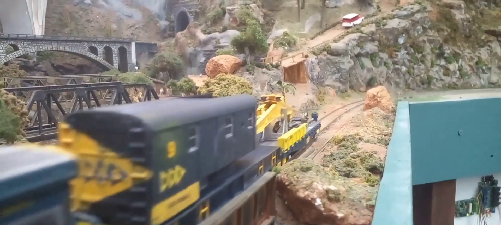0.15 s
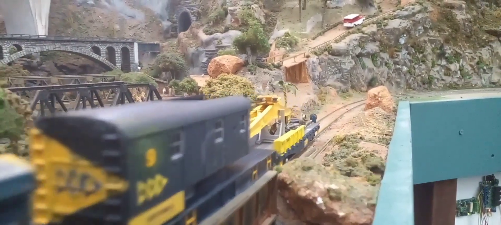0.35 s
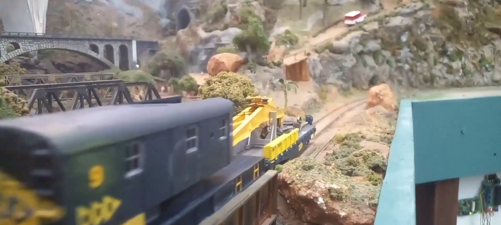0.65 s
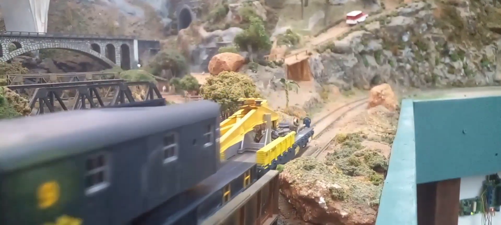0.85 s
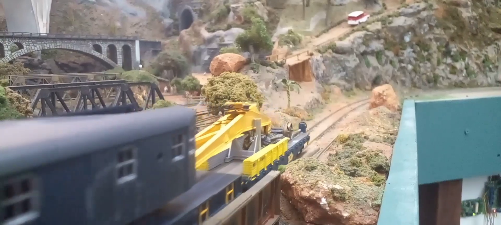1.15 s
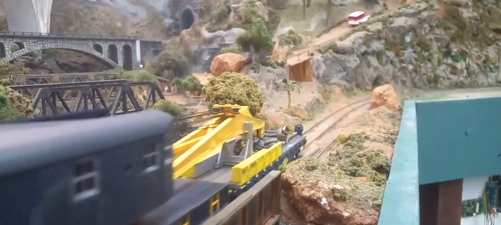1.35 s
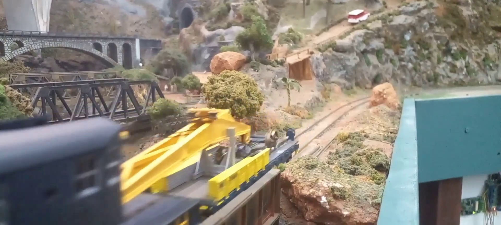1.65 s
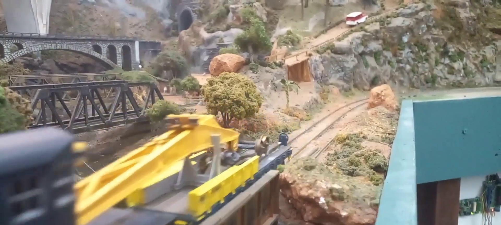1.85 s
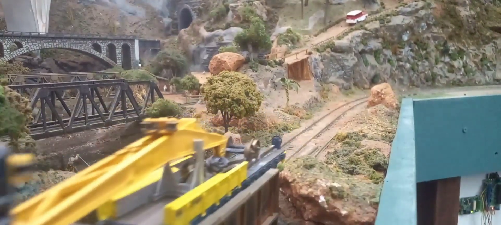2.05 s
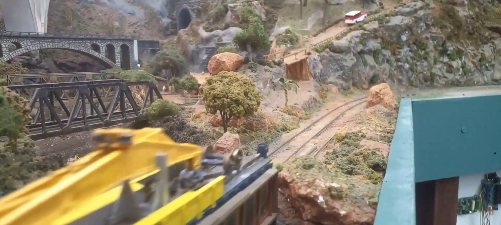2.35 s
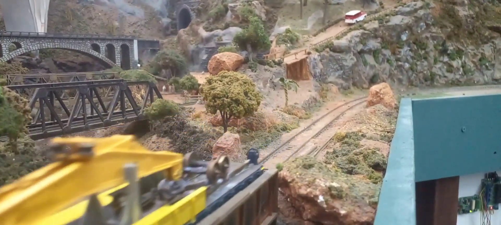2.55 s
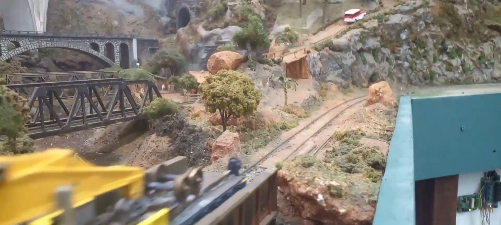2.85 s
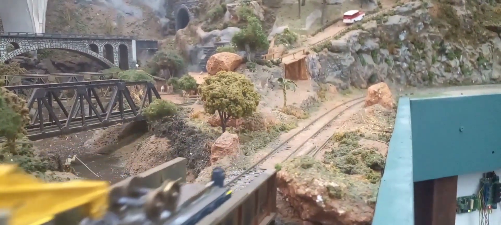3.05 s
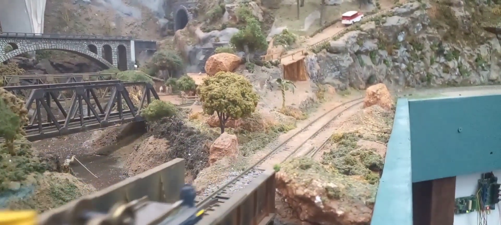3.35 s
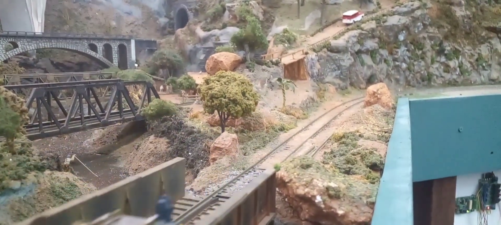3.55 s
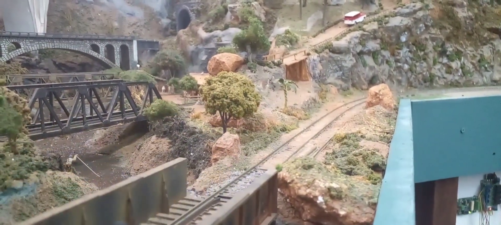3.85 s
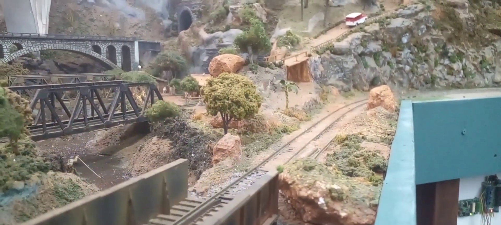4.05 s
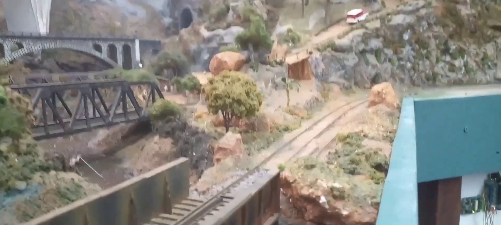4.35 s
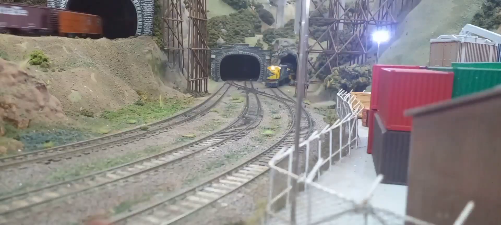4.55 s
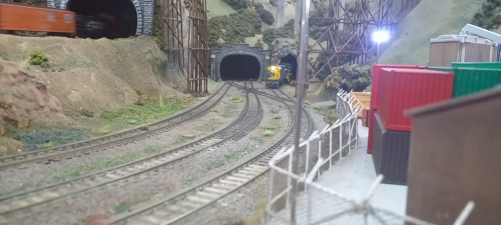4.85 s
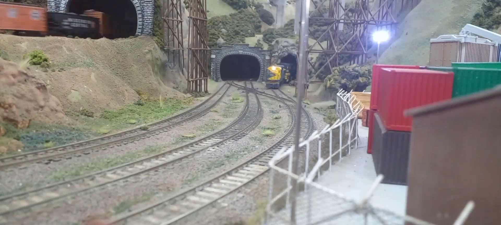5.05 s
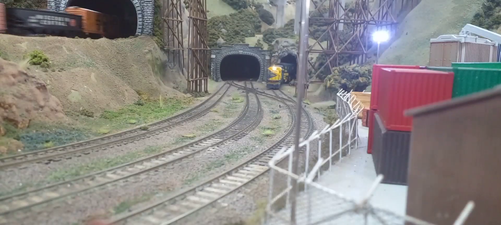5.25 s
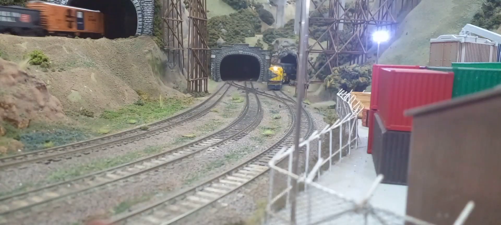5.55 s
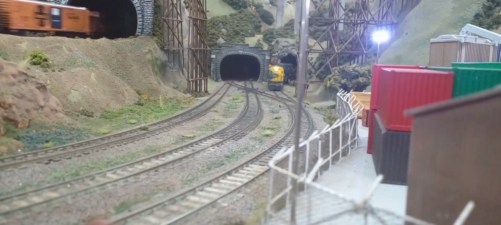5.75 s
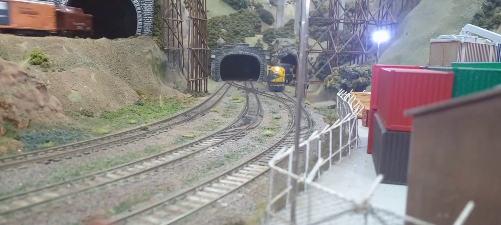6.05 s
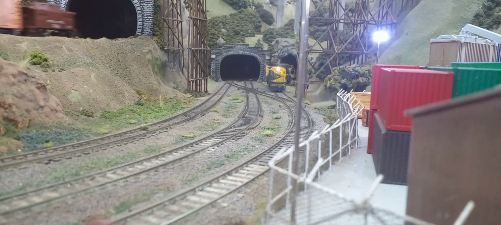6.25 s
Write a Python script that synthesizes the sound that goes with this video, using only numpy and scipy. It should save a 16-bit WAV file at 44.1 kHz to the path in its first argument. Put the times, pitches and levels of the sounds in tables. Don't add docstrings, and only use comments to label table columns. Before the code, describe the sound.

A quiet miniature train passes close by, its motor humming low and buzzy while wheels hiss and tick over joints. Clicks are faint at first, then crisp and bright, with light flange scuffs. The sound stops dead for a moment, then a denser, fuller rolling noise from several trains begins at once, rattling over points until the end. Dry indoor close pickup, centred.

```python
import sys
import numpy as np
from scipy import signal
from scipy.fft import rfft, irfft, next_fast_len
from scipy.io import wavfile
from scipy.ndimage import uniform_filter1d, map_coordinates

SR = 44100
rng = np.random.default_rng(int(sys.argv[2]) if len(sys.argv) > 2 else 0)


def gain_from_db(level_db):
    decades = np.asarray(level_db, float) / 20
    return 10 ** decades


def bounce(signal):
    frames = np.transpose(np.atleast_2d(signal))
    limited = np.clip(frames, -1, 1)
    pcm = np.round(limited * 32767).astype(np.int16)
    wavfile.write(sys.argv[1], SR, pcm)


N = 282240
TIME = np.arange(N) / SR
BRIDGE_ENDS_S, LAYOUT_STARTS_S = 4.2805, 4.4352
MIC_TOP_HZ = 15850
PATCHY_DB = 0.6

# (time [s], roll level [dB])
WHEEL_LOAD = [(0, -48), (.2, -49.5), (.55, -47), (.7, -49), (1.0, -46.5), (1.15, -50), (1.45, -47.5),
              (2.0, -47.5), (2.17, -46), (2.27, -48.5), (2.6, -47.5), (2.75, -45.5), (2.9, -45.5),
              (3.0, -48), (3.35, -47), (3.58, -50), (3.68, -47.5), (4.28, -47.5)]
FIZZ_DB, FIZZ_DB_PER_LOAD_DB, FIZZ_NEAR_DB, FIZZ_NEAR_S = -70.5, 0.5, 6, 1.2
DECK_DB, DECK_NEAR_DB, DECK_NEAR_S = -59, 8.5, 1.6
USUAL_LOAD_DB, HISS_DB, HISS_DB_PER_LOAD_DB, HISS_FADE_DB, HISS_FADE_S = -48, -56.5, 0.98, 3.5, 3.98
# (time [s], level [dB], half length [s])
DECK_THUMPS = [(0.037, -42, .03), (0.276, -48, .06), (0.697, -38.5, .04), (.81, -42.5, 0.048),
               (1.075, -40, 0.027), (1.22, -46, 0.055), (1.503, -45.5, 0.13), (2.35, -56, .1),
               (2.75, -55, 0.046), (3.22, -52, .06), (3.55, -54, .05), (3.9, -54, .08), (4.151, -48, 0.17)]
# (frequency [Hz], density [dB per Hz])
DECK_SPECTRUM = [(12, -56.5), (20, -28), (43, -8.5), (96, 4), (135, 2.5), (162, -17.5), (200, -0.5),
                 (260, -39.5), (440, -120)]
# (frequency [Hz], density [dB per Hz])
ROLL_SPECTRUM = [(590, -27.5), (1000, -7), (1110, -10.5), (1400, 0.5), (1720, -2), (2380, -1.5),
                 (2920, -12), (3200, -12.5), (4160, -36), (7040, -120)]
# (frequency [Hz], density [dB per Hz])
HISS_SPECTRUM = [(1650, -20.5), (2800, -2), (3060, -5.5), (3470, -3), (3780, 0), (4350, -6), (5350, -5.5),
                 (6430, -8), (6910, -13), (7840, -26.5), (8200, -24.5), (10700, -52), (18000, -120)]
# (frequency [Hz], density [dB per Hz])
FIZZ_SPECTRUM = [(4410, -37), (7500, -4.5), (8030, -18.5), (9310, -5.5), (11400, -2.5), (14100, 2),
                 (15100, 1.5), (16200, -6.5)]

# (time [s], shaft speed [turns/s], hum level [dB], share of far colour [0-1])
MOTOR_RUN = [(0, 33, -50, 0), (.12, 32.98, -48, 0), (.28, 33.2, -44, 0.02), (.44, 33.4, -51.5, .03),
             (.6, 33.56, -45.5, 0.03), (.85, 33.82, -48.5, 0.12), (1.05, 33.93, -44, 0.22),
             (1.2, 34.1, -47.5, 0.7), (1.4, 34.25, -48, 0.86), (1.6, 34.48, -44, 1),
             (2.2, 34.66, -47, 0.84), (2.6, 34.68, -52, 0.9), (3.0, 34.81, -47.5, 0.96),
             (3.45, 34.79, -46.5, 0.9), (3.75, 34.86, -50.5, 1), (3.95, 34.65, -57.5, 0.8)]
# (shaft multiple [-], level [dB])
NEAR_COLOUR = [(1, -12.5), (2, -20.5), (3, 0.5), (4, 4.5), (5, -7.5), (6, -11), (7, -4.5), (8, 6),
               (9, -1.5), (10, -12), (11, -9), (12, -12)]
# (shaft multiple [-], level [dB])
FAR_COLOUR = [(1, -19.5), (2, -24.5), (3, -14.5), (4, -4), (5, -9), (6, -7), (7, 4), (8, -10.5), (9, -8),
              (10, -4), (11, -14.5), (12, -14.5)]
# (frequency [Hz], density [dB per Hz])
GEAR_SPECTRUM = [(88, -40.5), (150, -9.5), (247, -4.5), (370, -5.5), (473, -11), (672, -11), (1090, -20.5),
                 (1300, -20), (1690, -28.5), (2860, -120)]
GEAR_DB, GEAR_DB_PER_S = -46.5, -0.53
# (frequency [Hz], level [dB])
WHINE_LINES = [(59.2, -56.5), (11779, -88), (13550, -86), (15649, -95)]

# (time [s], bright peak [dB], dull part [dB], top [dB], rebound delay [s])
RAIL_JOINTS = [(0.3085, -44, -2, -23, 0.0078), (0.6716, -36.5, -0.5, -27, .013),
               (1.3085, -26, -8, -23, .013), (1.6107, -31.5, -4, -12.5, .0077),
               (1.8583, -35, -3, -14, .0072), (1.9862, -20.5, -13.5, -21, .0131),
               (2.174, -20, -12.5, -23.5, .0124), (2.365, -22.5, -10.5, -19, 0.0097),
               (3.015, -22.5, -11, -20.5, 0.009), (3.2115, -20, -10.5, -25.5, 0.0039),
               (3.676, -22.5, -9.5, -20.5, .0094), (3.8509, -29, 0, -12.5, 0.008),
               (3.911, -26.5, -7, -19, .006)]
# (time [s], bright peak [dB], dull part [dB], top [dB])
FAINT_JOINTS = [(0.1843, -39, -15, -12), (0.2917, -41, 7, -19), (0.393, -36, 0.5, -14),
                (0.5274, -43, -3, -14), (0.9388, -44, -3, -17), (.992, -43, -4, -20), (1.088, -52, -2, -20),
                (1.4954, -48, 3, -17), (1.7053, -44.5, 7, -25), (2.4574, -50, 8, -21),
                (2.609, -47, -6, -24), (2.6369, -46, 4, -13), (2.0074, -25, -8, -31),
                (2.068, -34.5, -6, -30), (2.831, -33, -11, -25), (2.8393, -33, -6, -26),
                (2.8847, -46, 8, -15), (2.9294, -46, 2, -22), (3.269, -44, 1, -15), (3.2774, -45, -6, -7),
                (3.3907, -37.5, -10, -31), (3.4246, -43, -7.5, -19.5), (3.6444, -49.5, 8, -13),
                (3.6854, -35, -6, -19), (3.9143, -31, -7, -22), (.378, -42, 0, -20), (.3175, -44, -6, -20),
                (1.0635, -50, -4, -20), (2.9455, -52, -6, -20), (3.7584, -45, 2, -20),
                (4.1043, -44, 4.5, -15)]
REBOUND_DB, REBOUND_DULL_DB, JOINT_T60_S = -12, 7, 0.021
# (time [s], bright peak [dB], dull part [dB], top [dB], t60 [s])
FLANGE_SCUFFS = [(.033, -43, 2, -11, 0.086), (.377, -37, 3.5, -15, 0.07), (.508, -40.5, 4.5, -16, 0.12),
                 (.877, -43, 4, -18, 0.15), (.953, -45, 8.5, -20, 0.088), (.976, -45.5, 6, -24, 0.088),
                 (2.075, -42.5, 2, -27, 0.083), (3.451, -37.5, -1, -21, 0.097),
                 (3.86, -41, 3.5, -14.5, 0.17), (3.911, -28, -9, -20, 0.03), (1.617, -46, 5, -18, .04),
                 (2.886, -45, 4, -24, 0.053)]
# (frequency [Hz], width [Hz], level [dB])
RAIL_MODES = [(1520, 350, -2), (1960, 300, -2), (2425, 250, -1), (3640, 600, -3.5)]
# (frequency [Hz], width [Hz], level [dB])
HEAD_MODES = [(4590, 230, -4), (5390, 330, 2), (6450, 460, 1), (7200, 300, -5)]
# (frequency [Hz], width [Hz], level [dB])
TICK_MODES = [(8520, 2800, -2), (11650, 2000, 1.5), (13800, 1800, 0.5)]

# (time [s], low mode level [dB], high mode level [dB])
COUPLER_KNOCKS = [
    (.2925, -38, -25),
    (.3092, -33, -27),
    (.380, -29, -36),
    (0.3955, -24, -28),
    (.512, -38, -32),
    (5.733, -20.5, -24),
    (5.828, -27, -25),
]
# (frequency [Hz], width [Hz], level [dB])
CAR_MODES = [(640, 260, 4), (1213, 490, 2)]
# (time [s], level [dB], pitch [Hz], t60 [s])
STRUCK_RINGS = [(2.008, -37, 2050, .04), (3.0155, -32, 1960, .06), (3.8517, -24.5, 2331, .045),
                (3.8517, -30, 2708, .07), (3.864, -35, 2500, .09), (3.862, -46, 4210, .12),
                (3.86, -48, 5152, .1), (3.852, -35, 3680, .03), (3.9135, -35, 7140, .03),
                (3.9205, -37, 1550, .04), (3.9376, -38, 2340, .03), (3.94, -39, 1550, .12),
                (2.8865, -34, 2150, .025), (2.895, -35, 1840, .03), (2.84, -32, 1600, .025),
                (2.931, -38, 1750, .03), (1.611, -34, 3950, .025), (1.7055, -38, 3250, .025),
                (.9845, -35, 1750, .03), (.5285, -35, 2450, .02), (.3945, -37, 5800, .02),
                (4.72, -37, 620, .3), (4.72, -38, 575, .3), (4.47, -41, 295, .9), (4.72, -40, 500, .3),
                (5.88, -41, 345, .4), (6.15, -45, 660, 1.2), (4.5985, -20.5, 4300, .022),
                (4.5985, -28, 5700, .015), (4.7862, -21, 4100, .022), (4.7853, -24, 2350, .03),
                (5.7318, -23, 3300, .02), (5.7318, -25, 4200, .02), (5.8925, -23, 3650, .022),
                (5.893, -26, 5200, .022), (4.52, -24, 4030, .02), (4.4495, -25, 3250, .018),
                (5.151, -27, 5000, .015), (5.2645, -27, 5000, .015), (5.2975, -22, 2000, .02),
                (.3095, -28.5, 1270, .036), (.3095, -32.5, 534, 0.046), (.311, -34, 900, .03),
               (.3095, -40, 5000, .015), (.2927, -34, 1300, .02), (.396, -38, 1200, .02),
               (1.3092, -40, 2200, .022), (1.3092, -40, 3692, .022), (1.859, -44, 2207, .022),
               (1.859, -42, 3639, .022), (1.9875, -31.5, 3348, 0.028), (1.988, -35, 1981, .028),
               (2.008, -34, 3623, .025), (2.008, -36, 5426, .022), (2.1748, -34, 3660, .025),
               (2.1748, -40, 1518, .025), (2.1748, -32, 6560, .02), (2.188, -33, 1948, 0.029),
               (2.3658, -39, 2500, .025), (2.3658, -33, 3294, 0.027), (2.3658, -40, 6556, .02),
               (3.0158, -28, 6420, .018), (3.0158, -37, 3740, .025), (3.0245, -33, 3900, .02),
               (3.0245, -38, 2070, .02), (3.2122, -35, 2426, .025), (3.2122, -33, 3730, .025),
               (3.2122, -37, 5740, .02), (3.2122, -33, 7200, .018), (3.6768, -36, 1940, 0.024),
               (3.6768, -33, 2400, .025), (3.6768, -36, 1582, .025), (3.8517, -33, 6550, .018)]

# (time [s], level [dB], half length [s])
BOARD_BOOMS = [
    (4.62, -43.5, 0.13),
    (4.97, -42, 0.035),
    (5.3, -44, 0.13),
    (5.49, -43, 0.02),
    (5.66, -44, 0.045),
    (5.91, -45, 0.046),
    (6.17, -43, .04),
    (6.34, -42, 0.042),
]
# (frequency [Hz], density [dB per Hz])
BOARD_SPECTRUM = [(12, -68), (20, -38), (24, -25), (35, -15), (54, -5), (108, 2), (124, 0.5), (200, -10.5),
                  (260, -43), (440, -120)]
BOARD_DB, BOARD_DB_PER_S = -46, -2.5
# (frequency [Hz], density [dB per Hz])
RUSH_SPECTRUM = [(130, -34), (200, -8), (290, -4.5), (400, -9.5), (630, -5.5), (800, -6.5), (1190, -4),
                 (1950, 0), (2500, -1), (3200, -3), (4400, -7), (4900, -11.5), (6400, -17.5), (8000, -41)]
RUSH_DB, RUSH_PEAK_S, RUSH_SAG_DB = -30.5, 5.4, 0.4
# (time [s], level [dB], half length [s])
POINT_RATTLES = [(4.606, -29, 0.011), (4.736, -30.5, 0.025), (4.788, -32, 0.009), (4.86, -32, 0.014),
                 (5.056, -28, 0.01), (5.106, -29, 0.011), (5.175, -28, 0.028), (5.273, -29, 0.007),
                 (5.298, -28, 0.009), (5.357, -30, 0.015), (5.44, -30, 0.0053), (5.5, -31.4, 0.0066),
                 (5.54, -30.5, 0.019), (5.734, -37, 0.0069), (5.832, -26.5, 0.01), (5.898, -29, 0.027),
                 (6.04, -31, 0.015), (6.122, -30.6, 0.015), (6.208, -29, 0.0092), (6.277, -30, 0.009),
                 (6.367, -30.4, 0.027)]
RATTLE_DB = -4
# (frequency [Hz], density [dB per Hz])
BUSY_FIZZ_SPECTRUM = [(4410, -30.5), (7500, -13), (8230, -6), (10700, 2), (13300, 0), (15100, 0),
                      (15800, -10), (16200, -12)]
BUSY_FIZZ_DB = -58
# (time [s], peak level [dB])
CLATTER_BLOWS = [(4.4489, -31), (4.5192, -16), (4.598, -12), (4.7253, -23), (4.785, -19), (4.9926, -22),
                 (5.0525, -19), (5.1508, -15), (5.1727, -15), (5.264, -12), (5.3484, -31), (5.438, -30),
                 (5.5254, -21), (5.7324, -18), (5.8292, -13), (5.8928, -23), (6.0246, -21), (6.1196, -17),
                 (6.2642, -22.5), (6.3296, -24), (6.3585, -19.5), (6.3807, -26)]
CLATTER_TOP_DB, CLATTER_T60_S = -31.5, 0.027
# (frequency [Hz], width [Hz], level [dB])
FUZZY_TONES = [(96.4, 10, -57), (113.6, 9.8, -53), (624, 70, -53), (935, 82, -49), (1920, 25, -54.5)]


def unit(x):
    return x / np.sqrt(np.mean(x ** 2) + 1e-20)


def curves(rows):
    s, *columns = np.transpose(rows)
    return [np.interp(TIME, s, column) for column in columns]


def wobble(rate):
    knots = rng.standard_normal(int(N * rate / SR) + 4)
    return map_coordinates(knots, [TIME * rate])


def filtered(x, response):
    m = next_fast_len(N + 8192)
    return irfft(rfft(x, m) * response(np.fft.rfftfreq(m, 1 / SR)), m)[..., :N]


def ringing(x, modes):
    def response(f):
        total = 0
        for k, (hz, width, db) in enumerate(modes):
            total = total + (-1) ** k * gain_from_db(db) * 1j * f * width / (hz * hz - f * f + 1j * f * width)
        return total
    return filtered(x, response)


def rush(spectrum, contact_db, patchy_db):
    z = signal.stft(rng.standard_normal(N) * gain_from_db(contact_db), nperseg=512)[2]
    field = uniform_filter1d(rng.standard_normal(z.shape), size=6, axis=0)
    field = uniform_filter1d(field, size=8, axis=1)
    x = signal.istft(z * gain_from_db(patchy_db * unit(field)), nperseg=512)[1][:N]
    f, db = np.transpose(spectrum)

    def colour(hz):
        level_db = np.interp(np.log(hz + 1), np.log(f + 1), db, -120, -120)
        return gain_from_db(level_db) * (hz < MIC_TOP_HZ)
    return unit(filtered(x, colour))


def thumped(base_db, rows):
    swells = sum(gain_from_db(db) ** 2 * np.exp(-((TIME - s) / half) ** 2) for s, db, half in rows)
    return np.sqrt(gain_from_db(base_db) ** 2 + swells)


def bursts(s, db, t60, impact=4.1, rise=0.00024):
    t = np.arange(SR // 8) / SR
    force = rng.standard_normal((len(s), len(t))) * (1 - np.exp(-t / rise))
    force += impact * np.exp(-((t - 0.0002) / 0.00002) ** 2)
    chatter = gain_from_db(db[:, None] - 60 * t / np.clip(t60, 0.004, 0.3)[:, None]) * force
    at = np.round((s + 0.0006) * SR).astype(int)[:, None] + np.arange(len(t))
    return np.bincount(at.ravel(), chatter.ravel(), N + SR)[:N]


def capsule(x):
    return signal.sosfilt(signal.butter(8, 7500, fs=SR, output="sos"), x)


def clicks(rows, **touch):
    s, db, dull_db, top_db, t60 = np.transpose(rows)
    dull = ringing(bursts(s, db + dull_db + 10.5, 2.0 * t60, **touch), RAIL_MODES)
    bright = ringing(bursts(s, db + 3.5, t60, **touch), HEAD_MODES)
    tick = bursts(s, db + top_db + 9.0, 0.91 * t60, **touch)
    return capsule(dull + bright) + ringing(ringing(tick, TICK_MODES), TICK_MODES)


def passing():
    roll_db, = curves(WHEEL_LOAD)
    load_db = roll_db - USUAL_LOAD_DB
    contact = 0.4 * wobble(15) + 0.65 * wobble(70) + 1.6 * wobble(400)
    deck_db = DECK_DB + DECK_NEAR_DB * np.exp(-(TIME / DECK_NEAR_S) ** 2)
    deck = thumped(deck_db, DECK_THUMPS) * rush(DECK_SPECTRUM, 0.97 * wobble(14), patchy_db=-1.0)
    roll = gain_from_db(roll_db + 0.64) * rush(ROLL_SPECTRUM, 0.61 * contact, PATCHY_DB)
    gone_db = HISS_FADE_DB / (1 + np.exp((HISS_FADE_S - TIME) / 0.12))
    hiss_db = HISS_DB + HISS_DB_PER_LOAD_DB * load_db + 0.97 - gone_db
    hiss = gain_from_db(hiss_db) * rush(HISS_SPECTRUM, 0.86 * contact, PATCHY_DB)
    near_db = FIZZ_NEAR_DB * np.exp(-(TIME / FIZZ_NEAR_S) ** 2)
    fizz_db = FIZZ_DB + FIZZ_DB_PER_LOAD_DB * load_db + near_db
    fizz = gain_from_db(fizz_db) * rush(FIZZ_SPECTRUM, 0.5 * contact, PATCHY_DB / 2)
    return deck + roll + hiss + fizz


def motor():
    turn_hz, hum_db, far = curves(MOTOR_RUN)
    turn = 2 * np.pi * np.cumsum(turn_hz * (1 + 0.008 * wobble(7))) / SR
    far = np.clip(far, 0, 1)
    hum = np.zeros(N)
    for (k, near_db), (_, far_db) in zip(NEAR_COLOUR, FAR_COLOUR):
        waver_db, slip = 1.4 * wobble(12), 0.4 * wobble(12)
        level_db = near_db + far * (far_db - near_db) + waver_db
        hum += gain_from_db(level_db) * np.sin(k * turn + slip + rng.uniform(0, 2 * np.pi))
    whirr = rush(GEAR_SPECTRUM, np.cos(turn) + 1.48 * wobble(20), patchy_db=0.0)
    return gain_from_db(hum_db - 4) * hum + gain_from_db(GEAR_DB + GEAR_DB_PER_S * TIME) * whirr


def whine():
    out = np.zeros(N)
    for hz, db in WHINE_LINES:
        level_db = db + 3.5 + 1.5 * wobble(6)
        out += gain_from_db(level_db) * np.sin(2 * np.pi * hz * TIME + hz / 16000 * wobble(25))
    return out


def joints():
    drops = [(*row[:4], JOINT_T60_S) for row in [*RAIL_JOINTS, *FAINT_JOINTS]]
    rebounds = [(s + after, db + REBOUND_DB, dull_db + REBOUND_DULL_DB, top_db, JOINT_T60_S)
                for s, db, dull_db, top_db, after in RAIL_JOINTS]
    return clicks(drops + rebounds) + clicks(FLANGE_SCUFFS, impact=0.3, rise=0.0039)


def knocks():
    s, *levels = np.transpose(COUPLER_KNOCKS)
    t60 = np.full(len(s), 0.022)
    out = np.zeros(N)
    for db, mode in zip(levels, CAR_MODES):
        out += ringing(ringing(bursts(s, db, t60, impact=6.3), [mode]), [mode])
    return out


def rings():
    out, t = np.zeros(N + SR), np.arange(SR) / SR
    drift_turns = 0.07 * np.pad(wobble(150), (0, SR))
    for s, db, hz, t60 in STRUCK_RINGS:
        at = round(s * SR)
        decay = gain_from_db(db - 60 * t / t60) * (1 - np.exp(-t / 0.00078))
        out[at:at + SR] += decay * np.sin(2 * np.pi * (hz * t + drift_turns[at:at + SR]))
    return out[:N]


def clatter():
    s, db = np.transpose(CLATTER_BLOWS)
    t60 = np.full(len(s), CLATTER_T60_S)
    body = ringing(bursts(s, db - 12, t60), [*RAIL_MODES, *HEAD_MODES[:2]])
    tick = bursts(s, db + CLATTER_TOP_DB + 3.5, t60)
    return capsule(body) + ringing(ringing(tick, TICK_MODES), TICK_MODES)


def fuzzy_tones():
    out = np.zeros(N)
    for hz, width, db in FUZZY_TONES:
        mode = [(hz, width, 0)]
        out += gain_from_db(db) * unit(ringing(ringing(rng.standard_normal(N), mode), mode))
    return out


def busy():
    contact = 0.15 * wobble(18) + 0.45 * wobble(80) + 1.15 * wobble(600)
    board_db = BOARD_DB + BOARD_DB_PER_S * (TIME - LAYOUT_STARTS_S)
    board = thumped(board_db, BOARD_BOOMS) * rush(BOARD_SPECTRUM, 0.5 * wobble(18), PATCHY_DB)
    rush_db = RUSH_DB - RUSH_SAG_DB * (TIME - RUSH_PEAK_S) ** 2
    rattles = [(s, db + RATTLE_DB, half) for s, db, half in POINT_RATTLES]
    roll = thumped(rush_db, rattles) * rush(RUSH_SPECTRUM, contact, PATCHY_DB)
    fizz = rush(BUSY_FIZZ_SPECTRUM, 0.63 * contact + 1.2 * wobble(25), PATCHY_DB)
    return board + roll + gain_from_db(BUSY_FIZZ_DB) * fizz + clatter() + fuzzy_tones()


def scene():
    lines = whine()
    blows = knocks() + rings()
    clicking = filtered(joints(), lambda hz: hz < MIC_TOP_HZ + 600)
    bridge = passing() + motor() + clicking + lines + blows
    bridge = bridge * np.clip((BRIDGE_ENDS_S - TIME) / 0.00078, 0, 1)
    layout = filtered(busy() + lines + blows, lambda hz: hz < MIC_TOP_HZ)
    layout = layout * np.clip((TIME - LAYOUT_STARTS_S) / 0.0024, 0, 1)
    return np.array([bridge + layout] * 2)


def low_pass(x):
    return signal.sosfilt(signal.butter(12, 16530, fs=SR, output="sos"), x)


def record(dry):
    hiss_spectrum = [(5500, -8.5), (7500, -6), (9000, -2), (12000, -1), (14400, -4)]  # (Hz, dB per Hz)
    stray = gain_from_db(-84.0) * rush(hiss_spectrum, 1.5 * wobble(6), patchy_db=3.5)
    stray = stray * (TIME < BRIDGE_ENDS_S)
    return low_pass(dry + stray * [[1], [-1]])


dry = scene()
out = record(dry)
bounce(out)
```